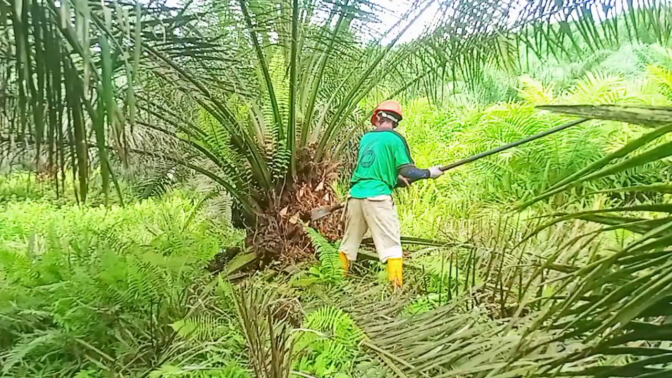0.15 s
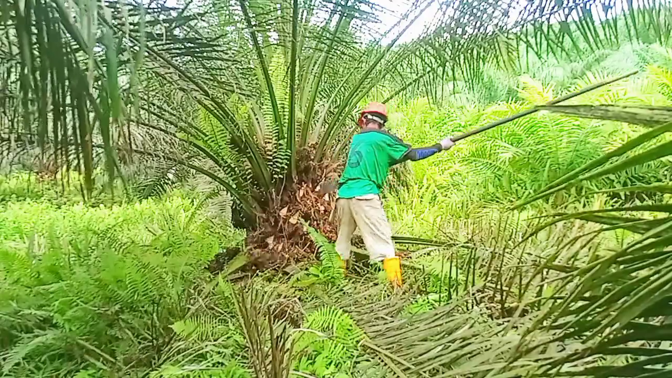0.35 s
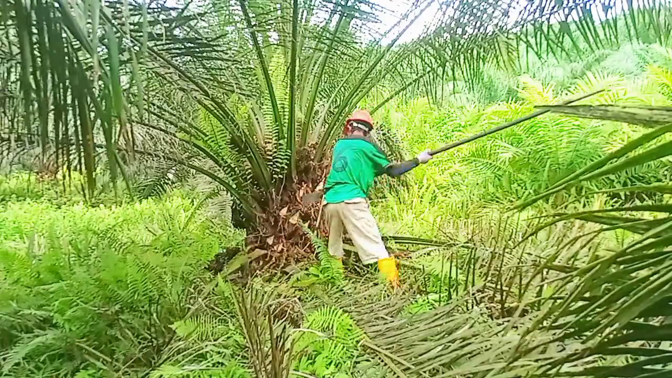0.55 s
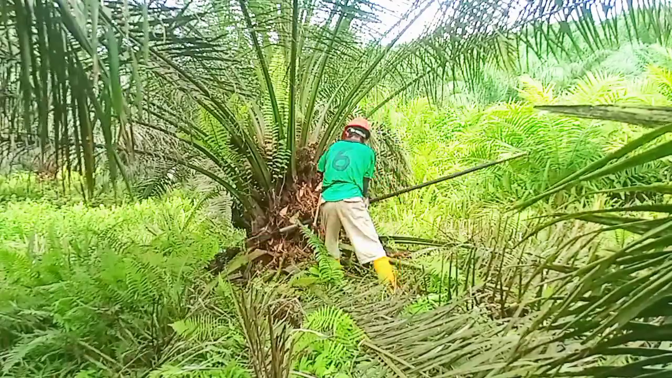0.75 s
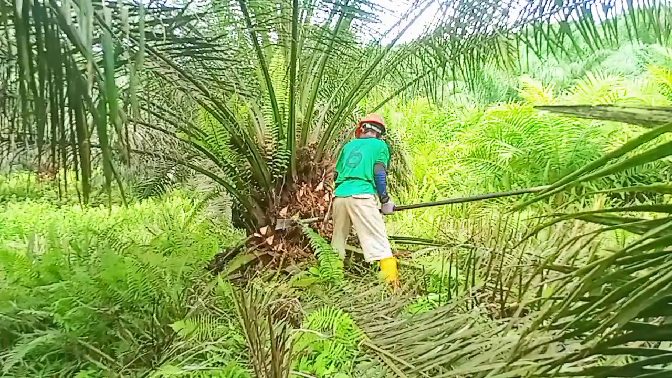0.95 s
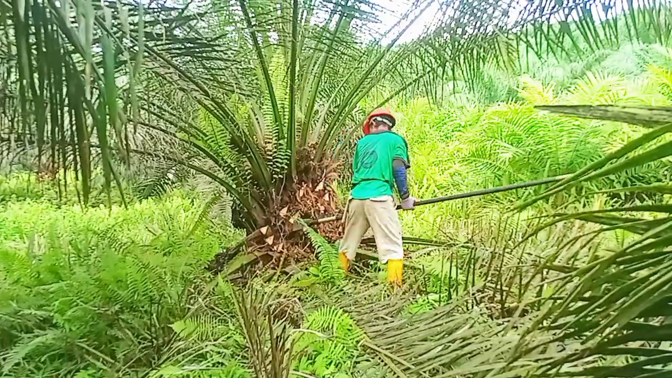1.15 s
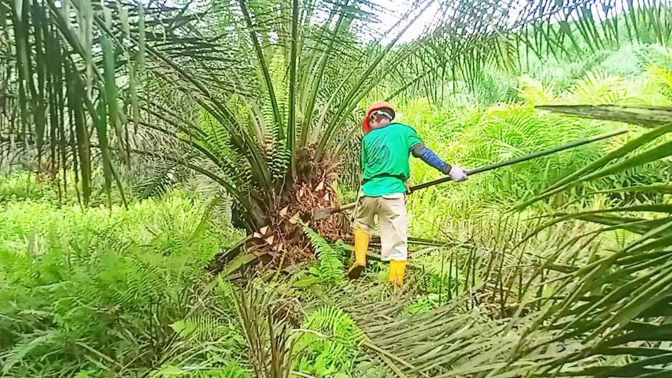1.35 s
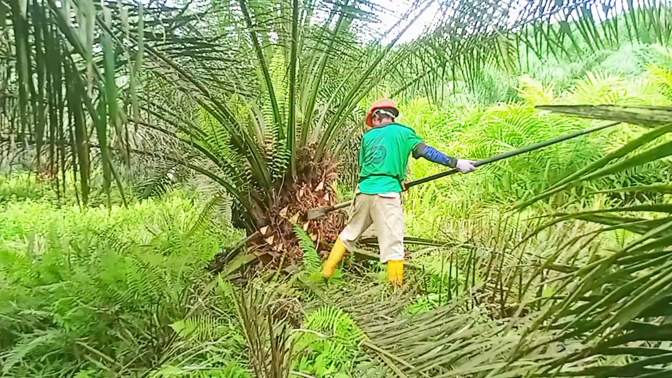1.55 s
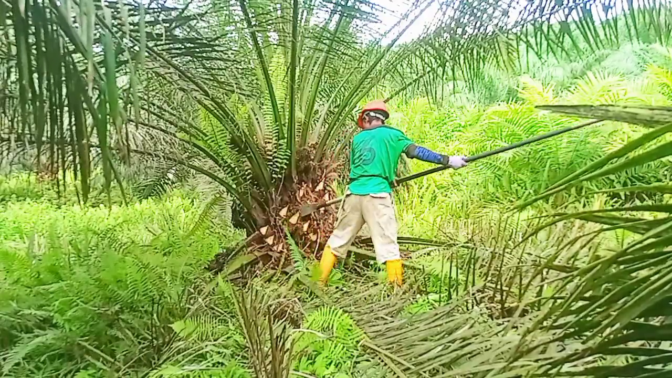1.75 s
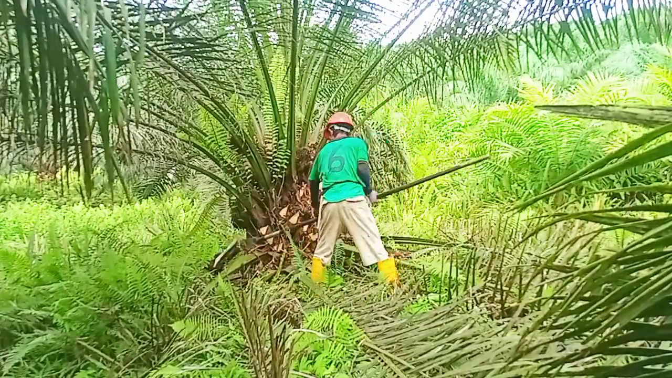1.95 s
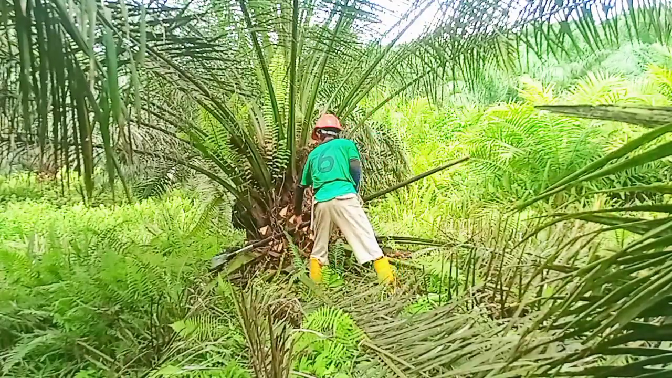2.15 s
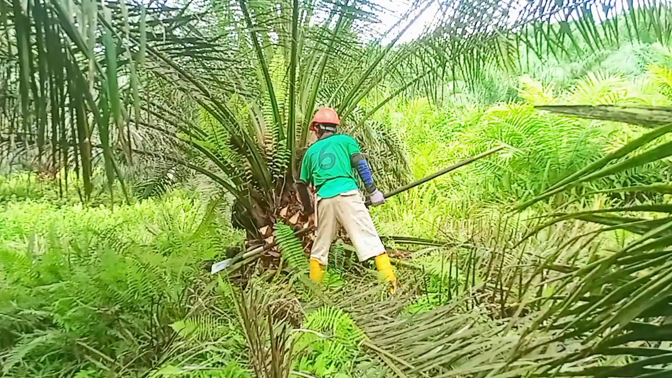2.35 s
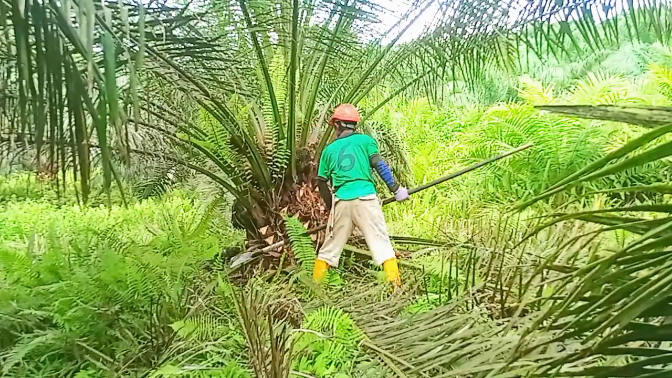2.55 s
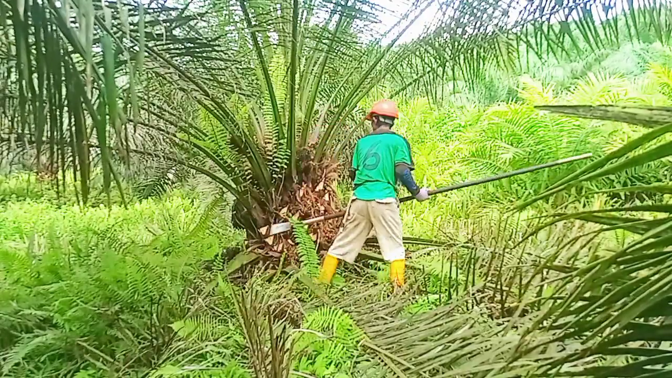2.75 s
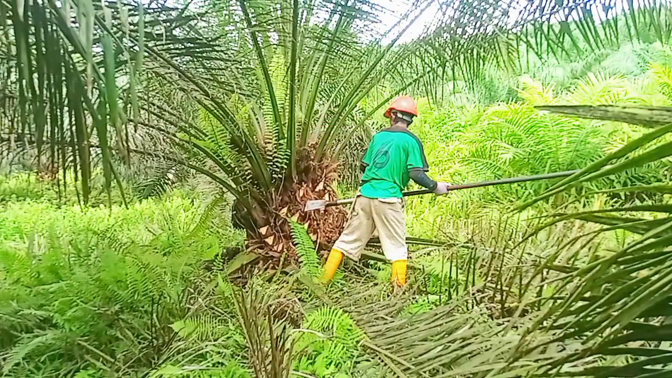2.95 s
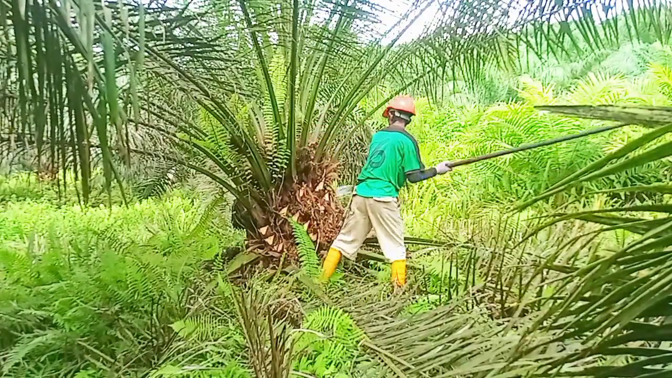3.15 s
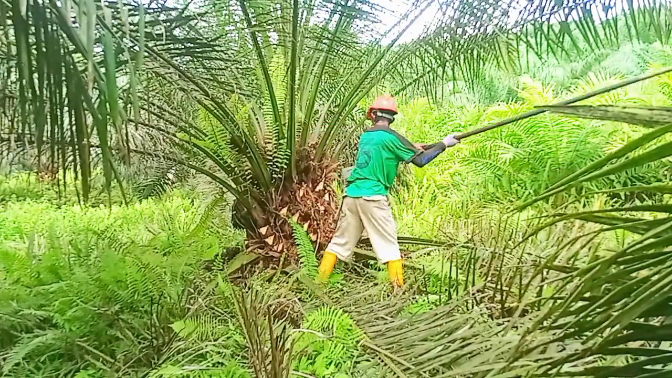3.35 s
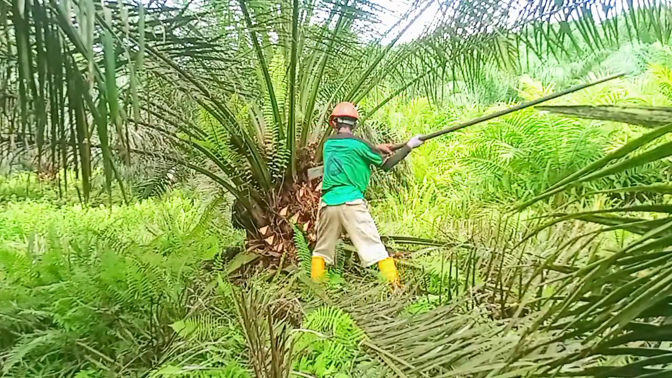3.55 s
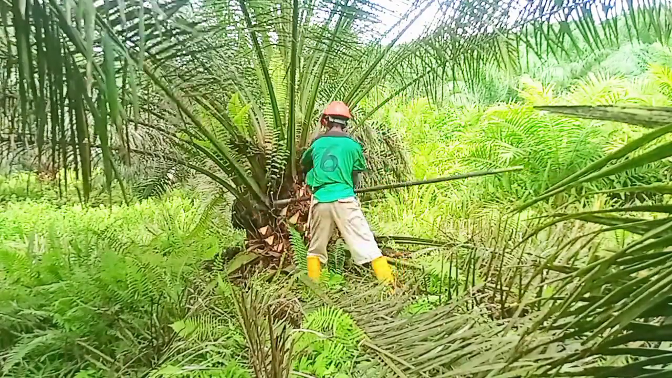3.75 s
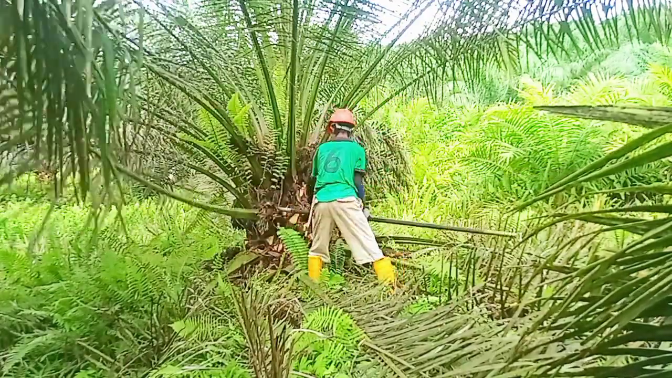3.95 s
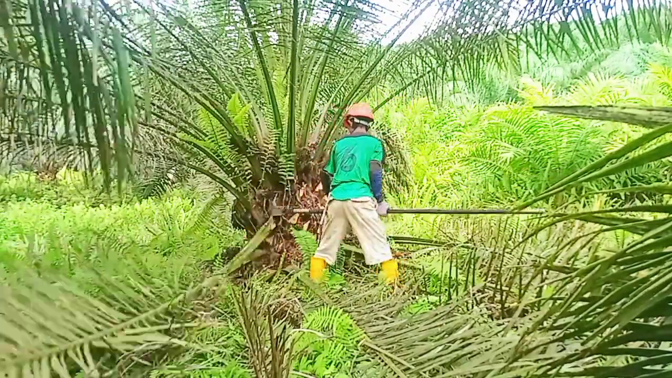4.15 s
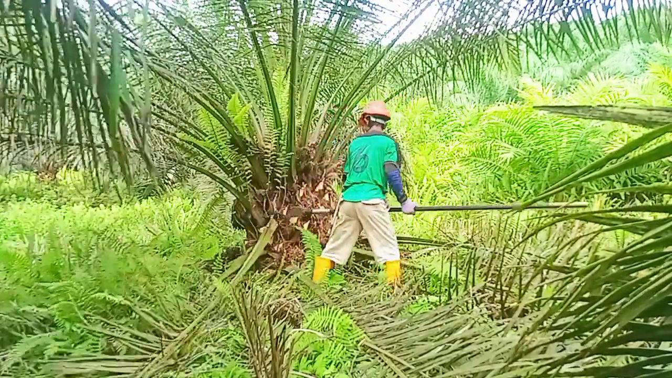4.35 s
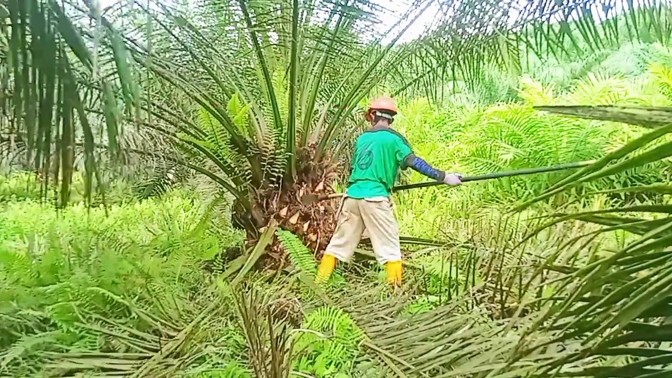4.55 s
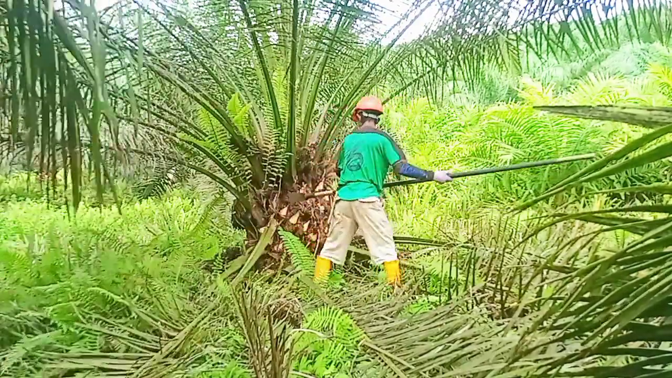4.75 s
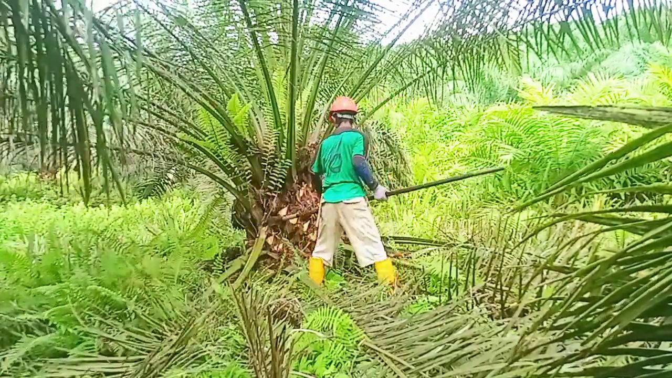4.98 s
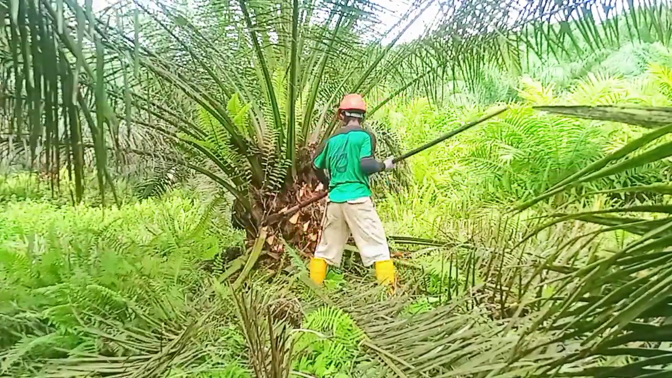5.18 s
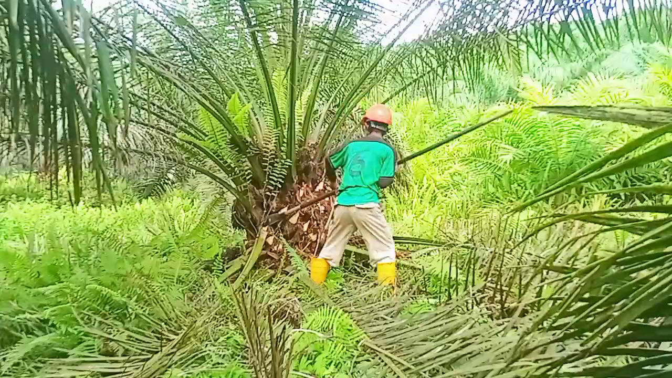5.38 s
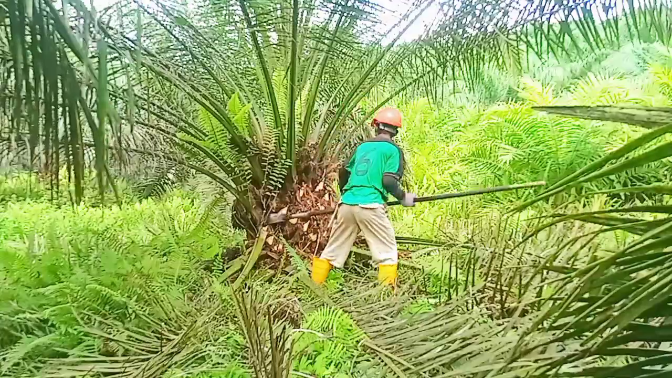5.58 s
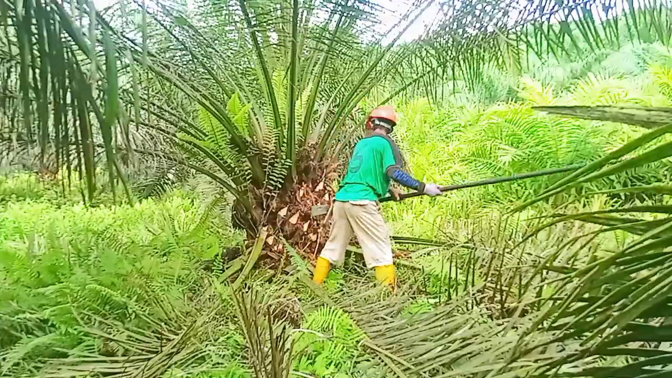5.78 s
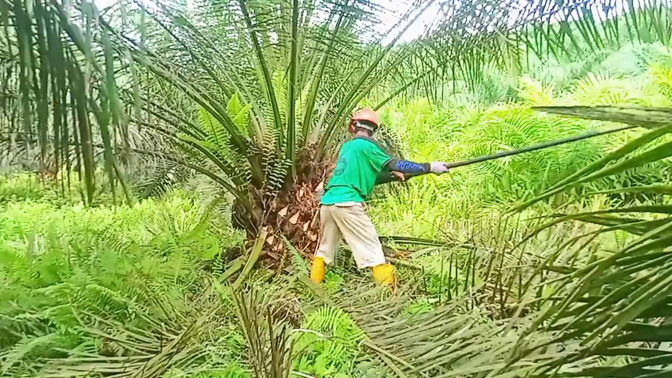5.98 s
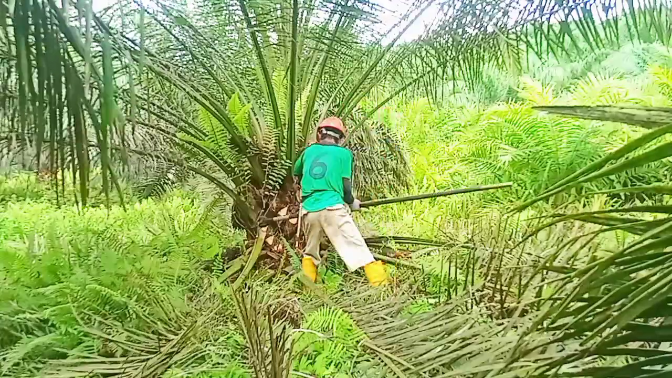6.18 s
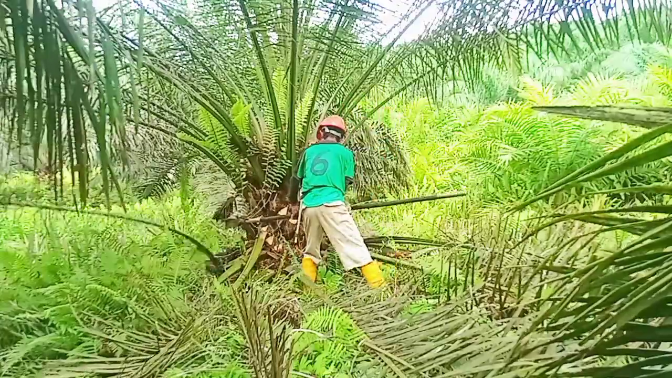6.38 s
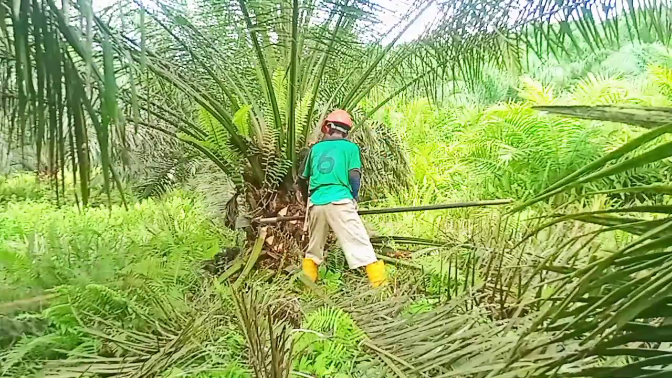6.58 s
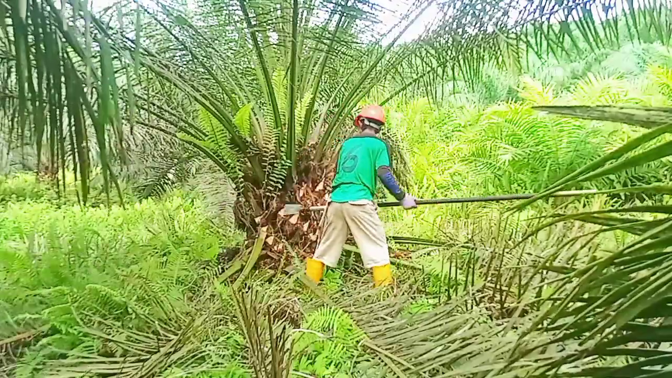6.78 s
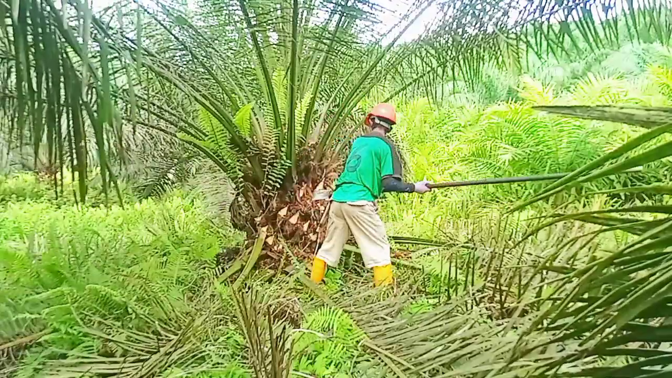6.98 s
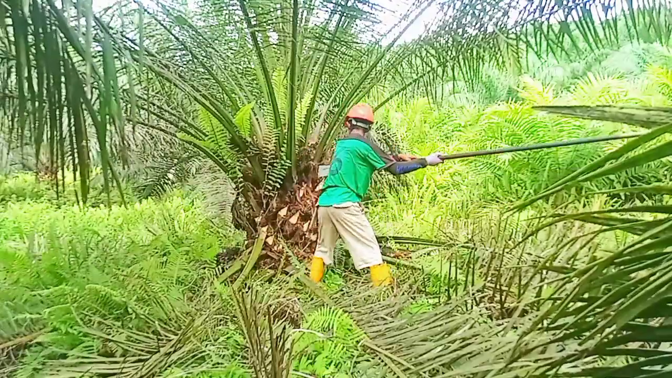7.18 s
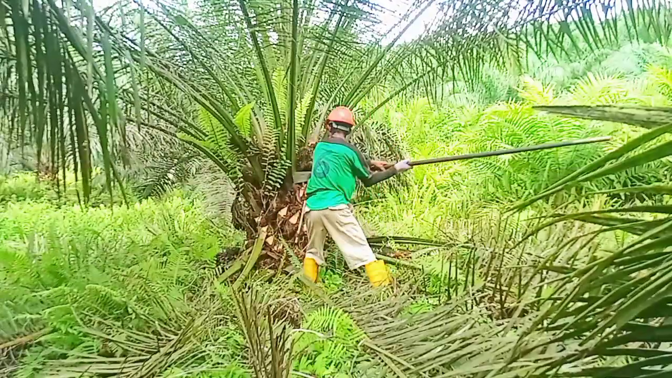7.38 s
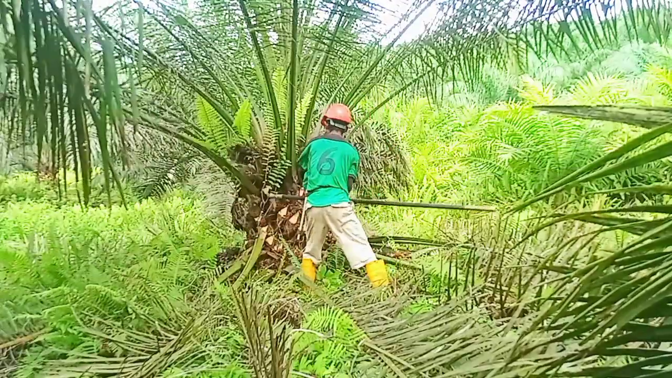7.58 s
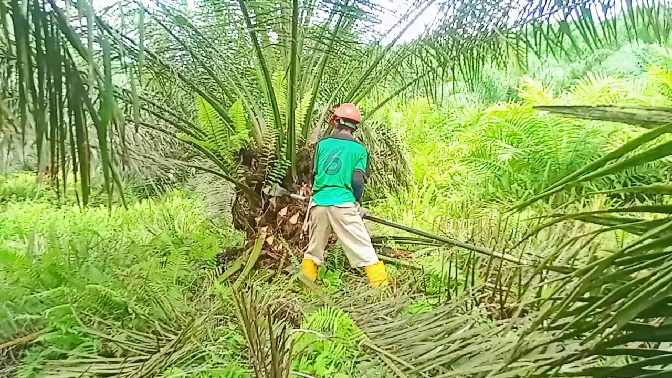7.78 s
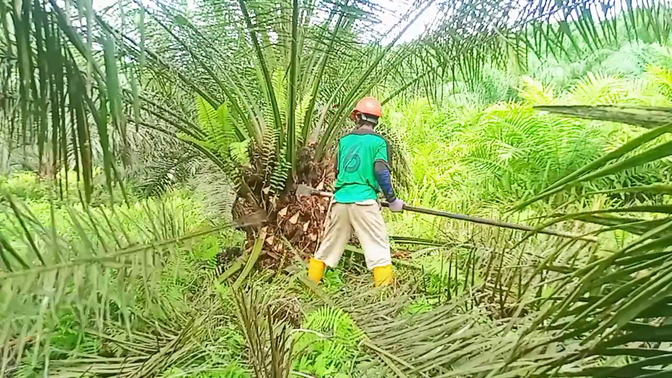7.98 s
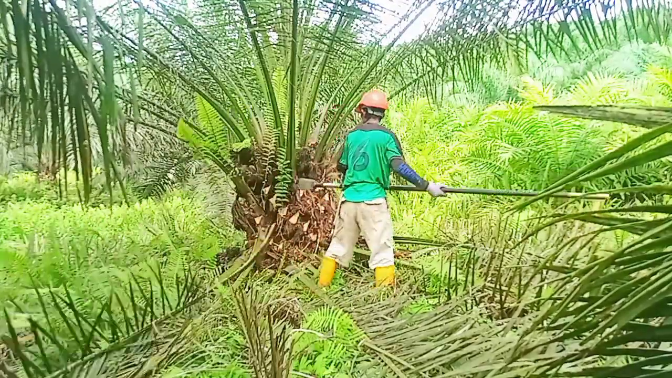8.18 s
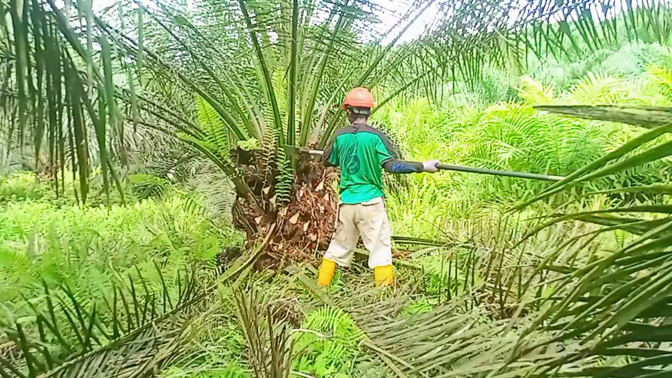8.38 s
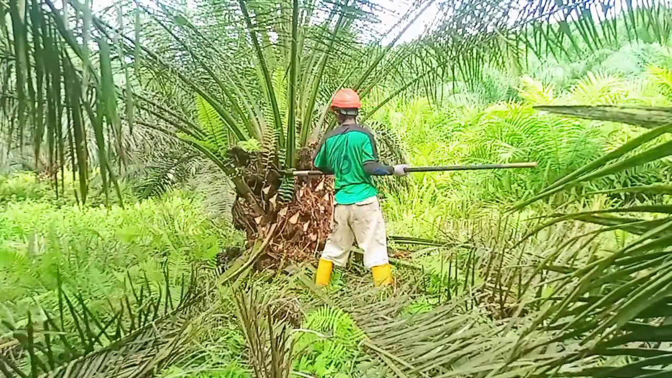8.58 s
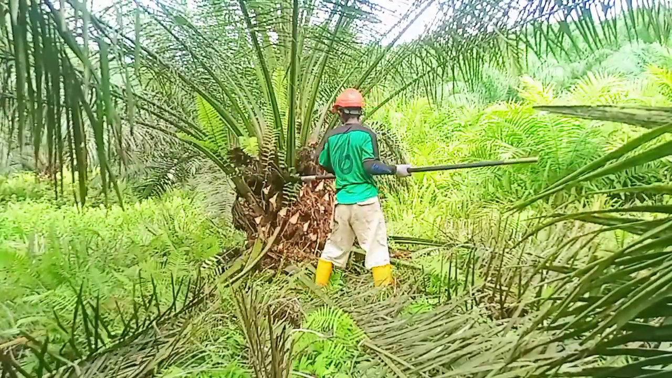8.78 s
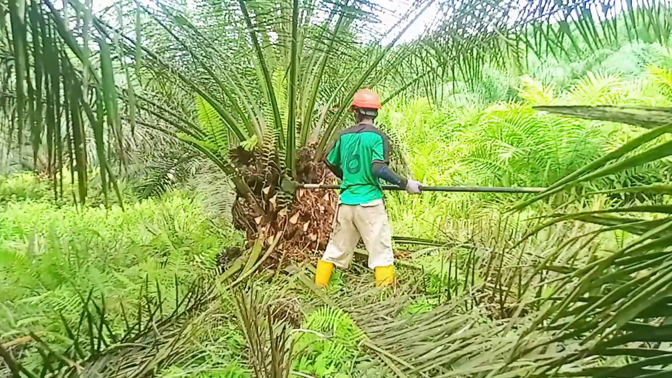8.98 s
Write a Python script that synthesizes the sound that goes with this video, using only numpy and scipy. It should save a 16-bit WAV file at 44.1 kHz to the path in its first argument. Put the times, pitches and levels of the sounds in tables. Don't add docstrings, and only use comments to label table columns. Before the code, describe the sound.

Outdoors among palms, a worker's long-pole steel chisel strikes frond bases about six times in nine seconds. Each hard, woody crack tears fibres, rings the blade briefly and shakes the crown. Dry fibres snap between blows; cut fronds sweep down and butts thud softly. High insects buzz throughout over a faint leaf hush, with tiny distant animal calls. Stereo microphone several metres away, open and dry.

```python
import sys
import numpy as np
from scipy import signal
from scipy.fft import rfft, irfft, next_fast_len
from scipy.io import wavfile
from scipy.ndimage import uniform_filter1d

SR = 44100
rng = np.random.default_rng(int(sys.argv[2]) if len(sys.argv) > 2 else 0)


def store_pcm(level_fs):
    pcm = np.round(np.clip(level_fs, -1, 1) * 32767).astype(np.int16)
    wavfile.write(sys.argv[1], SR, np.atleast_2d(pcm).T)


def undo_db(level):
    steps = np.asarray(level, float) / 20
    return 10 ** steps


N = 398223
FFT_LEN = next_fast_len(N)
HZ = np.fft.rfftfreq(FFT_LEN, 1 / SR)
CONTROL_S = np.arange(0, N + 32, 32) / SR
LAG = 44
HUSH_DB = 100
KNOCK_RISE_S = .0025


def evened(x):
    return x / np.sqrt(np.mean(x ** 2) + 1e-20)


def read(points):
    f, value = np.transpose(points)
    return np.interp(np.log(HZ + 1), np.log(f), value)


def shaped(x, gain):
    return irfft(rfft(x, FFT_LEN) * gain, FFT_LEN)[..., :N]


def add(mix, s, sound):
    part = mix[..., max(round(s * SR), 0):][..., :sound.shape[-1]]
    part += sound[..., :part.shape[-1]]


def drift(per_s, size):
    pole = np.exp(-2 * np.pi * per_s * 32 / SR)
    coarse = signal.lfilter([1], [1, -pole], rng.standard_normal((size, N // 32 + 2)))
    rows = [uniform_filter1d(c, size=5) for c in coarse]
    return evened(np.array([np.interp(np.arange(N) / 32, np.arange(len(c)), c) for c in rows]))


# f/Hz, level/dB
LEFT_PORT = [(40, -11), (300, -16), (2300, -1), (5200, 0), (6500, 7.5), (7600, 7), (8600, 5.5), (10500, -6),
             (13700, -7), (14700, 3.5), (15600, 6.5), (16000, -42)]
RIGHT_PORT = [(40, -17), (300, -17), (2300, -8), (4800, -2), (6400, 2), (8000, -6.5), (10600, 6.5),
              (12500, -0.5), (13800, -7.5), (14800, 7), (15600, 4), (16000, -35.5)]


def ports():
    return undo_db([read(LEFT_PORT), read(RIGHT_PORT)])


def late(x):
    return np.array([np.roll(x, LAG), x])


def crackle(per_s, spread_db, clump_db, clumps_per_s):
    size_db = spread_db * np.minimum(rng.exponential(1, (3, N)), 5)
    size = undo_db(size_db + clump_db * drift(clumps_per_s, size=1))
    return evened(size * rng.standard_normal((3, N)) * (rng.random((3, N)) < per_s / SR))


# low f/Hz, high f/Hz
CONTACT_BANDS = [(100, 300), (600, 1200), (2500, 4500), (9500, 13500)]


def in_bands(clicks, same):
    share = np.clip(read(same), 0, 1)
    common = rfft(late(clicks[0]), FFT_LEN) * np.sqrt(share)
    separate = rfft(clicks[1:], FFT_LEN) * np.sqrt(1 - share)
    z = (common + separate) * ports()
    out = []
    for k, (lo, hi) in enumerate(CONTACT_BANDS):
        hat = read([(np.sqrt(a * b), j == k) for j, (a, b) in enumerate(CONTACT_BANDS)])
        core = (z * hat).mean(0)[(HZ > lo) & (HZ < hi)]
        inside = np.sqrt(2 * np.sum(abs(core) ** 2)) / FFT_LEN
        out.append(irfft(z * hat / inside, FFT_LEN)[:, :N])
    return out


def patchy(x, db, frames, bins):
    z = signal.stft(x, nperseg=256)[2]
    field = rng.standard_normal(z.shape[1:])
    field = uniform_filter1d(field, max(round(frames), 1), axis=1)
    field = evened(uniform_filter1d(field, max(round(bins), 1), axis=0))
    mean_power_db = db ** 2 * np.log(10) / 20
    return signal.istft(z * undo_db(db * field - mean_power_db), nperseg=256)[1][:, :N]


# f/Hz, bell width/Hz, left level/dB, right level/dB, flutter/dB, flutter rate/Hz
CHORUSES = [
    (7526, 362, -37.5, -50.5, 0.9, 29),
    (5355, 156, -57, -62.5, 2.5, 11),
    (15280, 330, -56.5, -60.5, 1, 28),
]


def insects():
    out = 0
    for hz, width_hz, left_db, right_db, flutter_db, per_s in CHORUSES:
        bell = np.exp(-((HZ - hz) / width_hz) ** 2 / 4)
        buzz = evened(shaped(rng.standard_normal((2, N)), bell))
        sway_db = flutter_db * drift(per_s, size=1) + 0.64 * drift(0.42, size=1)
        out = out + buzz * undo_db(np.array([[left_db], [right_db]]) + sway_db)
    return out


# f/Hz, level/dB
AIR_COLOUR = [(30, 1), (80, 20), (200, 9.5), (500, 2.5), (1500, -6.5), (4200, -13), (6000, -8),
              (9000, -16.5), (12000, -17.5), (16000, -6)]
AIR_DB = -65.5


def air():
    noise = rng.standard_normal((3, N))
    same = np.clip(read([(100, 0.43), (2000, 0.27), (4000, 0.027)]), 0, 1)
    colour = ports() * undo_db(read(AIR_COLOUR))
    x = shaped(noise[0], np.sqrt(same) * colour) + shaped(noise[1:], np.sqrt(1 - same) * colour)
    return undo_db(AIR_DB + 0.29 * drift(4.4, size=1)) * evened(x)


def leaf_power(s, db, stalk_db, hiss_db):
    level = np.interp(CONTROL_S, s, db)
    return undo_db(2 * np.array([level + stalk_db - 8, level + stalk_db, level, level + hiss_db]))


def rustle():
    bands = in_bands(crackle(14000, 2.2, 1.4, 30), [(100, .6), (600, .15), (3000, .05)])
    contact = falls() + shakes() + brushes()
    powers = [np.interp(np.arange(N) / SR, CONTROL_S, p) for p in contact]
    out = sum(b * np.sqrt(p) for b, p in zip(bands, powers))
    return patchy(shaped(out, 1 / np.sqrt(1 + (210 / (HZ + 1)) ** 4)), 1.88, frames=4, bins=3)


# t/s, level/dB
FROND_FALLS = [
    [(0, -64), (.054, -53.5), (.078, -61.5), (.392, -55), (.462, -74)],
    [(3.6, -47), (3.84, -46.5), (3.9, -41.5), (3.97, -48.5), (4.07, -40.5), (4.11, -41), (4.16, -46.5),
     (4.215, -41.5), (4.26, -46), (4.518, -73), (4.64, -87)],
    [(6.15, -54.5), (6.25, -63.5), (6.492, -41.5), (6.572, -48), (6.618, -54), (6.826, -79), (6.9, -81)],
    [(7.36, -56), (7.422, -54), (7.57, -47.5), (7.62, -49.5), (7.7, -45.5), (7.73, -48), (7.88, -50),
     (7.936, -42.5), (8.075, -48), (8.13, -43), (8.2, -45), (8.43, -51.5), (8.48, -50.5), (8.51, -56.5),
     (8.6, -53), (8.63, -61.5)],
    [(8.85, -66), (8.95, -78), (9.03, -75)],
]
# stalk/dB, hiss/dB
FROND_COLOURS = [(-10, -6), (-9.5, 0), (-15, 4.5), (-9.5, 2.5), (-10, 11.5)]


def falls():
    power = 0
    for fall, colour in zip(FROND_FALLS, FROND_COLOURS):
        s, db = np.transpose(fall)
        times = [s[0] - .2, *s, s[-1] + .4]
        power = power + leaf_power(times, [db[0] - HUSH_DB, *db, db[-1] - HUSH_DB], *colour)
    return power


# t/s, level/dB, f/Hz, length/s
FAR_CALLS = [(0.01, -63.5, 457, 0.03), (3.38, -68.5, 704, 0.097), (5.008, -74, 434, 0.053),
             (5.668, -70, 1140, 0.037), (5.687, -74, 1635, .1), (5.793, -73, 1100, 0.055),
             (5.87, -72.5, 1170, 0.06), (6.659, -57.5, 956, 0.026), (6.863, -65, 886, 0.044)]


def pips():
    out = np.zeros(N)
    for s, db, hz, length_s in FAR_CALLS:
        end = .94 if hz < 1000 else 1.008
        glide = hz * np.linspace(2 - end, end, round(max(length_s, .01) * SR))
        tone = np.sin(2 * np.pi * np.cumsum(glide) / SR)
        add(out, s, undo_db(db) * tone * signal.windows.tukey(len(glide), .6))
    return np.array([out, out]) * undo_db([[2], [-2]] + 5.8 * drift(40, size=2))


# t/s, level/dB, stalk/dB, hiss/dB, t60/s
CHISEL_BLOWS = [(.4879, -14, -4.5, -4.5, 0.095), (.5105, -13, -12, -28, 0.05),
                (1.8235, -17.5, -5, -6, 0.078), (1.8434, -20, -5, -6.5, 0.12), (1.8625, -24, -7, -7, 0.078),
                (3.5288, -12, -14.5, -5, 0.095), (3.5428, -18, -4.5, -4.5, 0.061),
                (3.5855, -24.5, 3, -27, 0.054), (3.594, -29.5, 4, 2, 0.035),
                (4.6615, -29.5, -11, -7, 0.053), (4.672, -31.5, -5, -4, 0.18),
                (4.692, -21.5, -5.5, -6, 0.059), (4.7122, -14, -2, -29, 0.041),
                (5.3582, -28, -14, -2.5, 0.047), (6.0287, -23.5, -10.5, -10, 0.25),
                (6.0424, -13, -8, -7.5, 0.068), (6.054, -18.5, -7, -5, .08), (6.101, -33.5, 10, -16, 0.022),
                (6.1124, -30.5, 11, -16, 0.027), (7.2878, -22, -5, -11, 0.064),
                (7.286, -12.5, -13.5, -7, 0.1)]
# t/s, level/dB, stalk/dB, hiss/dB
FIBRE_TEARS = [(0.052, -43, -3, -13), (0.2133, -43, 0.5, -21), (0.267, -38.5, -15, 3), (.6898, -37, 1, -9),
               (0.729, -43, 3, -9), (.845, -56, 6.5, -18), (1.745, -44.5, -35, 4), (1.978, -28.5, -18, -1),
               (2.0457, -33.5, -17, -18), (2.1048, -39.5, 10.5, 1), (2.25, -41, -25, 1),
               (2.2633, -35, -12, 10), (3.622, -32, -26, -15), (3.69, -25.5, -12, -0.5),
               (6.3047, -31.5, -20, -18), (6.398, -34, -24.5, 0), (6.4542, -35, -27, 4),
               (7.4066, -36, -2.5, 2.5), (7.631, -29, -4, 6.5), (8.477, -41, -20.5, 12.5),
               (8.551, -35, -14, 5.5), (8.737, -40.5, -11, 0), (8.773, -42.5, 1.5, -13),
               (8.795, -48, -2, -12), (.625, -41, -1, -11), (.71, -47.5, 8, -12), (1.08, -55, -15, -10)]
TEAR_T60_S = 0.085
ALL_CUTS = sorted(CHISEL_BLOWS + [(*row, TEAR_T60_S) for row in FIBRE_TEARS])
# f/Hz, width/Hz, level/dB
STALK_MODES = [(903, 140, 4.5), (2570, 670, 3), (4250, 140, 1.5), (6200, 4300, 1)]


def cuts():
    power, t = np.zeros((3, N)), np.arange(SR // 3) / SR
    for s, db, stalk_db, hiss_db, t60 in ALL_CUTS:
        rise = 1 - np.exp(-t / (0.051 * t60))
        shape = rise ** 2 * (undo_db(-120 * t / t60) + undo_db(-26.0 - 120 * t / 0.055))
        add(power, s - .001, undo_db(2 * (db - 8.5 + np.array([[stalk_db], [0], [hiss_db]]))) * shape)
    same = [(300, 1.0), (2000, 0.7), (5000, 0.48), (12000, 0.34)]
    bands = in_bands(crackle(20000, 1.2, 0.26, 150), same)
    out = sum(b * np.sqrt(p) for b, p in zip(bands[1:], power))
    woody_db = sum(db / (1 + (2 * (HZ - hz) / width_hz) ** 2) for hz, width_hz, db in STALK_MODES)
    return patchy(shaped(out, undo_db(woody_db - 1.5)), 3.2, frames=3, bins=2)


# f/Hz, t60/s, level/dB
WOOD_MODES = [(900, 0.035, 2.5), (1100, 0.02, -4.5), (1620, 0.025, -13.5), (2100, 0.043, 1),
              (2500, 0.077, -3), (2803, 0.045, 0), (4110, 0.053, -1.5), (4960, .035, -4.5)]


def knocks():
    out, t = np.zeros(N), np.arange(SR // 10) / SR
    rise = 1 - np.exp(-t / KNOCK_RISE_S)
    chance = rng.standard_normal((len(ALL_CUTS), len(WOOD_MODES), 2))
    for (s, db, stalk_db, *_), row in zip(ALL_CUTS, chance):
        for (hz, t60, mode_db), (tune, share) in zip(WOOD_MODES, row):
            level_db = db - 12 + mode_db + 2.5 * share + (stalk_db + 7) * (hz < 1400)
            ring = np.sin(2 * np.pi * hz * (1 + 0.02 * tune) * t)
            add(out, s, undo_db(level_db - 60 * t / t60) * ring * rise)
    return shaped(late(out), ports())


CROWN_SHAKES = [
    (0.481, -39, 0.041, 0.16),
    (1.817, -46.5, 0.09, 0.04),
    (3.519, -40.5, 0.043, 0.17),
    (4.665, -38, 0.069, 0.17),
    (6.031, -38.5, 0.054, 0.0854),
    (7.277, -38, 0.051, 0.09),
]
JOLT_S, JOLT_DB = 0.0084, -6
LINGER_S, LINGER_DB = 0.27, -19
STALK_SPREAD_DB, HISS_SPREAD_DB = (-22, -12.5), (-7, -3)


def shakes():
    power = 0
    for s, db, climb, fall in CROWN_SHAKES:
        top = s + climb
        stalk_db = np.interp(CONTROL_S, [s, top], STALK_SPREAD_DB)
        hiss_db = np.interp(CONTROL_S, [s, top], HISS_SPREAD_DB)
        path_db = db + np.array([-HUSH_DB, JOLT_DB, 0, -HUSH_DB])
        power = power + leaf_power([s - 3 * JOLT_S, s, top, top + 5 * fall], path_db, stalk_db, hiss_db)
        linger_db = db + LINGER_DB + np.array([-HUSH_DB, 0, -HUSH_DB])
        power = power + leaf_power([s, top, top + 5 * LINGER_S], linger_db, -3.5, -2)
    return power


# t/s, level/dB, f/Hz
BITE_NOTES = [(.49, -26, 950), (.512, -28, 1020), (.692, -40, 2000), (.706, -42, 1000), (.835, -58, 2600),
              (1.153, -60, 3400), (1.824, -28, 1020), (1.979, -44, 3080), (2.046, -46, 2740),
              (2.105, -36, 1010), (3.541, -25, 900), (3.586, -29, 900), (3.62, -36, 4160),
              (4.66, -38, 3950), (4.685, -34, 1050), (4.711, -29, 904), (4.711, -30, 2100),
              (4.716, -30, 4000), (5.357, -40, 1100), (5.357, -44, 3100), (5.36, -46, 4890),
              (6.042, -27, 921), (6.043, -28, 2150), (6.053, -30, 921), (6.102, -33, 950),
              (6.112, -32, 880), (7.287, -29, 904), (7.288, -27, 2130), (7.288, -30, 4080),
              (7.308, -29, 2150), (7.63, -38, 900), (7.845, -38, 904), (8.775, -52, 850)]
PING_T60_S = .045


def pings():
    out, t = np.zeros(N), np.arange(SR // 10) / SR
    rise = 1 - np.exp(-t / KNOCK_RISE_S)
    for s, db, hz in BITE_NOTES:
        add(out, s, undo_db(db - 60 * t / PING_T60_S) * np.sin(2 * np.pi * hz * t) * rise)
    return shaped(late(out), ports())


# t/s, level/dB, second and third ring relative to the first/dB
BLADE_STRIKES = [(.4928, -54, 7, 2), (.5794, -58, -9, 10), (.6579, -47, -8, 4), (.7307, -57, -21, 11),
                 (1.8248, -48.5, 15, 12), (1.8594, -41, 6, 11.5), (1.8794, -48, -10, 0),
                 (1.9194, -46, 4, -9), (1.95, -45.5, -2, -8), (2.0607, -54, -3, -4), (2.2967, -57, 9, -7.5),
                 (2.8848, -47, 1, -13), (4.6613, -45, 8, -3), (5.3614, -47, -3, 12.5),
                 (7.2893, -32, -5, -2), (8.7465, -53.5, -1, 14.5), (8.7894, -65, -5, 11),
                 (2.11, -58, -8, -6), (2.2, -67, -6, -6), (.765, -59, -17, 6), (6.15, -55, -8, -8),
                 (8.77, -58, -5.5, 5.5), (2.08, -58, -6, -11), (1.9, -48, -5.5, -6), (.69, -51, -11, -1),
                 (.795, -65, -15, 4), (2.32, -61, 0, -8)]
# f/Hz, t60/s
BLADE_MODES = [(2158, .6), (3860, .12), (2379, .18), (4880, .11), (4140, .1), (5706, .12), (10500, .2)]
# t/s, level/dB
EDGE_SCRAPES = [(2.265, -43), (2.29, -46), (5.3614, -49)]
UPPER_DB = (-11, -10, -12.5)
FREE_TAPS = (11, 13)
CHOKE_S, FREE_S = 0.04, 0.099
AFTERGLOW_DB = -15


def blade():
    (bitten, lifted), t = np.zeros((2, N)), np.arange(SR // 3) / SR
    detune = rng.uniform(-1, 1, (len(BLADE_STRIKES), 6))
    for k, ((s, db, *rel_db), row) in enumerate(zip(BLADE_STRIKES, detune)):
        if k in FREE_TAPS:
            target = lifted
            choke = undo_db(-420 * np.maximum(t - FREE_S, 0)) + undo_db(AFTERGLOW_DB)
        else:
            target = bitten
            choke = undo_db(-800 * np.maximum(t - CHOKE_S, 0))
        envelope = undo_db(db) * choke * (1 - np.exp(-t / .002))
        for (hz, t60), ring_db, tune in zip(BLADE_MODES, [0, *rel_db, *UPPER_DB], row):
            ring = np.sin(2 * np.pi * hz * (1 + 0.0031 * tune) * t)
            add(target, s, envelope * undo_db(ring_db - 60 * t / t60) * ring)
    edge_hz, edge_t60 = BLADE_MODES[-1]
    for s, db in EDGE_SCRAPES:
        add(lifted, s, undo_db(db - 60 * t / edge_t60) * np.sin(2 * np.pi * edge_hz * t))
    chatter, tremble = undo_db([[3.5], [2.5]] * drift(130, size=2))
    return undo_db(4.5) * shaped(late(bitten * chatter + lifted * tremble), ports())


# t/s, level/dB, f/Hz, t60/s
BUTT_THUDS = [(0.498, -55, 108, 0.032), (0.689, -61, 165, 0.06), (1.496, -61, 171, 0.066),
              (1.825, -50.5, 400, .03), (1.847, -49, 170, 0.13), (1.86, -45, 486, .05),
              (1.982, -38.5, 164, 0.082), (2.052, -53, 153, 0.11), (2.1, -41.5, 143, 0.048),
              (2.173, -54, 211, 0.089), (2.291, -57.5, 242, 0.11), (3.587, -37, 221, 0.051),
              (4.726, -40.5, 88, 0.15), (4.728, -44.5, 174, 0.092), (6.06, -52.5, 99.6, 0.059),
              (6.114, -43.5, 187, 0.073), (6.315, -49.5, 164, 0.085), (7.299, -58, 64.3, 0.26),
              (7.358, -53, 118, 0.075), (8.021, -52, 224, 0.057)]


def thuds():
    out, t = np.zeros(N), np.arange(SR // 3) / SR
    soil = signal.butter(2, [50, 380], "band", fs=SR, output="sos")
    puffs = evened(signal.sosfilt(soil, rng.standard_normal((len(BUTT_THUDS), len(t)))))
    for (s, db, hz, t60), puff in zip(BUTT_THUDS, puffs):
        push = np.sin(2 * np.pi * hz * t * (1 + 0.067 * np.exp(-t / 0.01)))
        push = push * undo_db(-60 * t / max(t60, .02))
        litter = 0.35 * puff * undo_db(-60 * t / 0.16)
        add(out, s, undo_db(db + 8.5) * (push + litter) * (1 - np.exp(-t / .0015)))
    return shaped(late(out), 1 / np.sqrt(1 + (55 / (HZ + 1)) ** 4)) * undo_db([[1.5], [-1.5]])


# t/s, level/dB, low f/Hz, high f/Hz
FIBRE_SNAPS = [(.6935, -37, 2000, 13000), (1.053, -39, 900, 6000), (1.155, -47, 1500, 4000),
               (2.046, -31, 1800, 9100), (2.093, -34, 700, 5000), (2.179, -25, 900, 13000),
               (2.251, -22, 5000, 17000), (2.265, -20, 3020, 15000), (2.281, -27, 4000, 14900),
               (3.441, -34, 3500, 9000), (7.338, -28, 2000, 8000), (7.63, -25, 700, 9000),
               (7.649, -20, 2500, 9000), (7.8457, -32, 700, 2500), (8.738, -28, 900, 12000),
               (2.884, -24, 1930, 8850), (3.3778, -16.5, 3360, 13600), (3.594, -12, 1000, 13000),
               (5.6481, -18, 4200, 11100), (5.722, -30.5, 1790, 11800), (6.398, -15, 5500, 15000),
               (6.5956, -9.5, 2550, 8800), (7.4078, -15, 700, 11000), (8.2994, -36, 3030, 12900),
               (8.55, -29, 3000, 16000), (8.833, -22, 8000, 14200)]
SCATTER_DB, SCATTER_T60_S = -28.5, 0.13
CRACK_DB, CRACK_T60_S = -13, .014


def snaps():
    out, t = np.zeros((2, N)), np.arange(4000) / SR
    decay = undo_db(-60 * t / SCATTER_T60_S) + undo_db(CRACK_DB - SCATTER_DB - 60 * t / CRACK_T60_S)
    scatter = rng.standard_normal((len(FIBRE_SNAPS), 2, 4000)) * decay
    for (s, db, lo_hz, hi_hz), tail in zip(FIBRE_SNAPS, scatter):
        edges_hz = [lo_hz, np.clip(hi_hz, lo_hz * 1.3, 20000)]
        band = signal.butter(3, edges_hz, "band", fs=SR, output="sos")
        click = signal.sosfilt(band, late(signal.unit_impulse(4000)) + undo_db(SCATTER_DB) * tail)
        add(out, s - LAG / SR / 2, undo_db(db) * click / abs(click).max())
    return shaped(out, undo_db([read(LEFT_PORT[:-1]), read(RIGHT_PORT[:-1])]))


# peak t/s, level/dB, rise/s and fall/s per 20 dB, stalk/dB
FERN_BRUSHES = [(1.07, -66, 0.1, 0.04, -15), (1.16, -64.5, 0.2, -0.07, -13), (7.02, -70, 0.14, -0.1, -13.5),
                (7.21, -68, 0.34, -0.1, -7), (1.47, -57, 0.19, 0.24, -19), (1.665, -57.5, .04, 0.2, -17),
                (1.94, -54.5, 0.11, 0.12, -10), (2.11, -54, 0.07, 0.1, -6), (2.19, -63, .04, .06, -6),
                (2.285, -49.5, 0.19, 0.07, -13), (2.633, -62.5, 0.27, 0.14, -13), (3.25, -77, 0.7, 1.1, -7),
                (5.08, -65.5, 1.2, 0, -24), (5.336, -74.5, 0.5, 0.8, -4.5), (5.36, -50, 0.05, 0.05, -28),
                (6.98, -77, 4.5, 1, -11), (7.7, -57, -0.1, 0.6, -21), (8.03, -38.5, 0.16, 0.15, -12),
                (8.77, -56, 0.34, 0.03, -8.5), (8.862, -54.5, 0.5, 0.04, -13.5)]
BRUSH_HISS_DB = -2.5


def brushes():
    power = 0
    for s, db, rise, fall, stalk_db in FERN_BRUSHES:
        times = [s - 5 * rise, s, s + 5 * fall]
        power = power + leaf_power(times, [db - HUSH_DB, db, db - HUSH_DB], stalk_db, BRUSH_HISS_DB)
    return power


def scene():
    work = rustle() + cuts() + knocks() + pings() + blade() + thuds() + snaps()
    return insects() + air() + pips() + work


# f/Hz, threshold/dB
MASKING = [(200, -101), (1500, -92.5), (2500, -90), (4300, -85.5), (6000, -88), (9000, -62), (11000, -64.5),
           (13000, -62)]
ROUNDED_OFF = .4


def dropouts(x):
    hz, _, z = signal.stft(x, SR, nperseg=2048, noverlap=1024, window="cosine")
    bands = z[:, :1024].reshape(2, 128, 8, -1)
    line_power = abs(bands) ** 2
    level_db = 10 * np.log10(line_power.mean(2) + 1e-20)
    strong = line_power > ROUNDED_OFF * line_power.mean(2, keepdims=True)
    strong[:, 0] = True
    loudest_db = uniform_filter1d(level_db.max(1, keepdims=True), size=3)
    f, base_db = np.transpose(MASKING)
    share = np.where(f > 8000, .5, .2)
    base_db, share = (np.interp(hz[4:1024:8], f, v)[:, None] for v in (base_db, share))
    wander = evened(uniform_filter1d(rng.standard_normal(level_db.shape), size=4))
    threshold_db = base_db + share * loudest_db + 4.5 * wander
    kept = bands * (level_db > threshold_db)[:, :, None] * strong
    z[:, :1024] = kept.reshape(2, 1024, -1)
    return signal.istft(z, SR, nperseg=2048, noverlap=1024, window="cosine")[1][:, :N]


def low_pass(x):
    return signal.sosfilt(signal.butter(12, 17100, fs=SR, output="sos"), x)


def record(dry):
    limits = 1 / (1 + (HZ / 16800) ** 120) / np.sqrt(1 + (20 / (HZ + 1)) ** 2)
    x = shaped(dry, limits)
    power = (x ** 2).mean(0)
    sudden = uniform_filter1d(power, size=96) > 4.5 * uniform_filter1d(power, size=2048)
    spared = np.clip(uniform_filter1d(sudden * 1., size=256) * 20, 0, 1)
    spared = uniform_filter1d(spared, size=128)
    mix = spared * x + (1 - spared) * dropouts(x)
    return low_pass(mix)


dry = scene()
out = record(dry)
store_pcm(out)
```